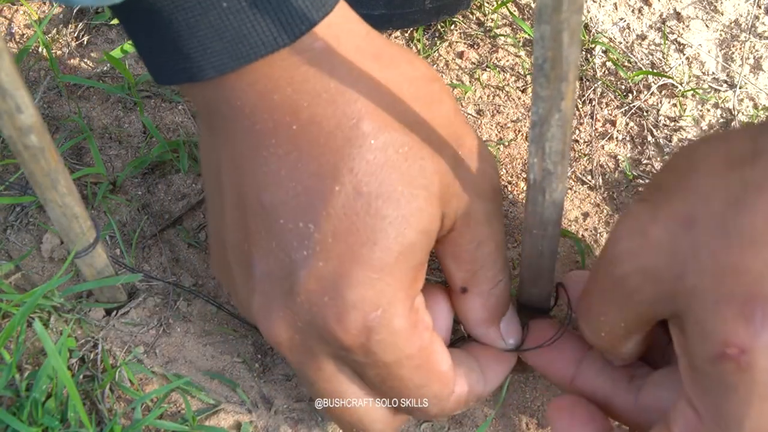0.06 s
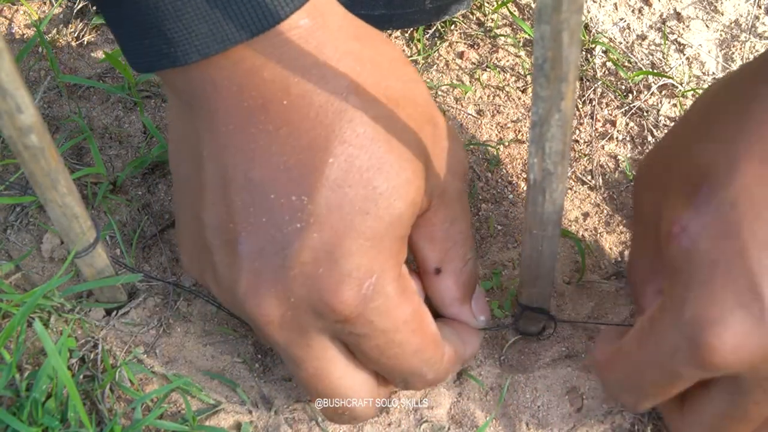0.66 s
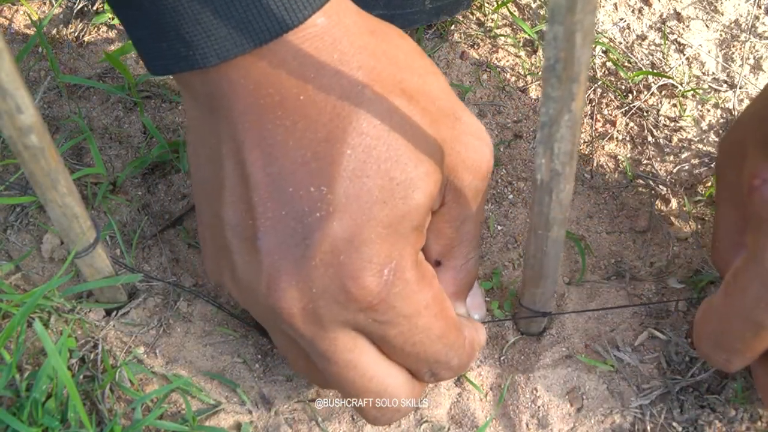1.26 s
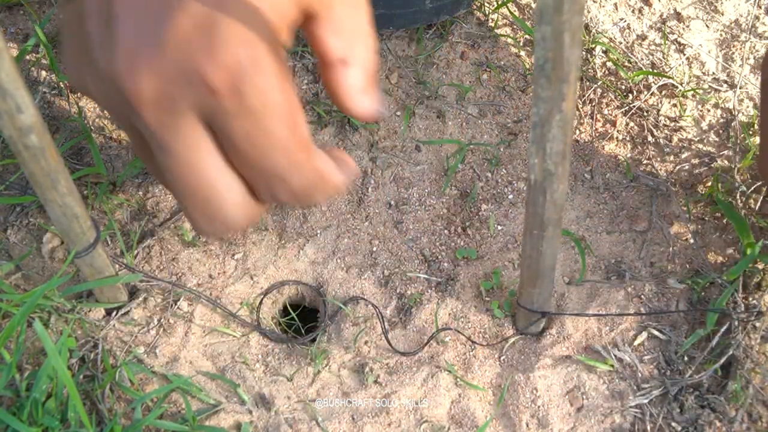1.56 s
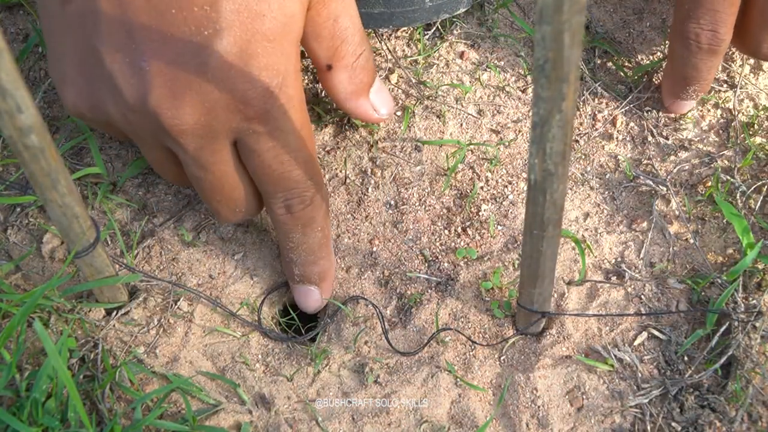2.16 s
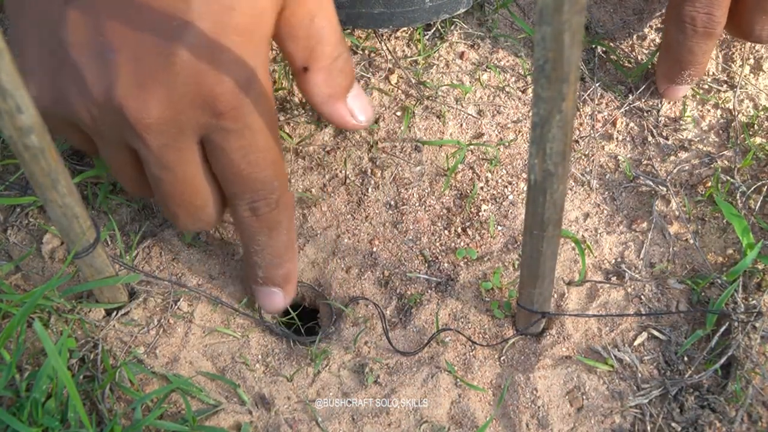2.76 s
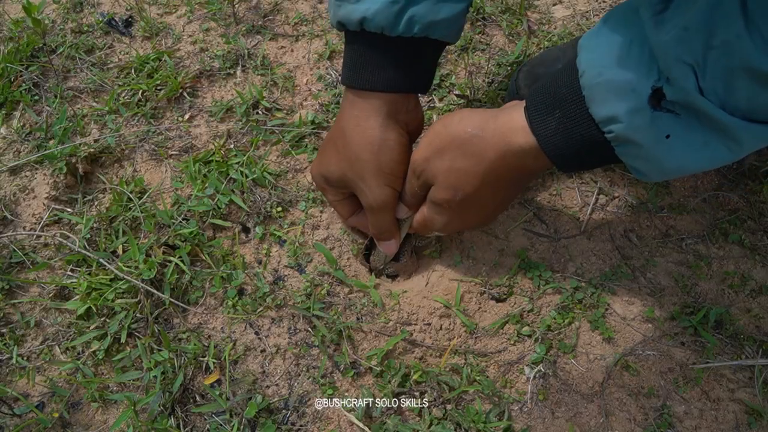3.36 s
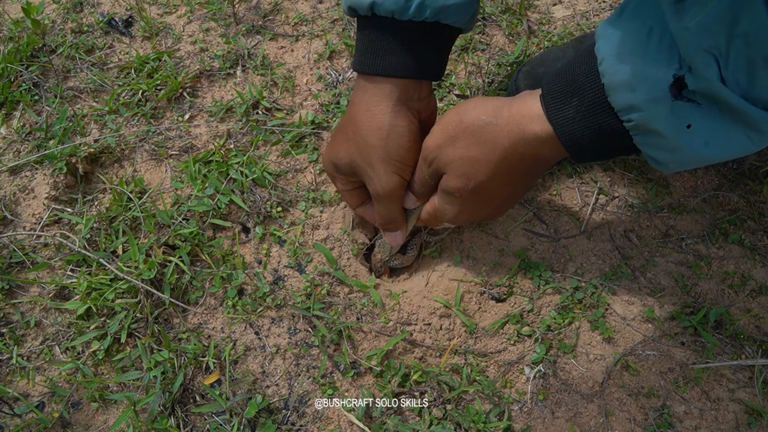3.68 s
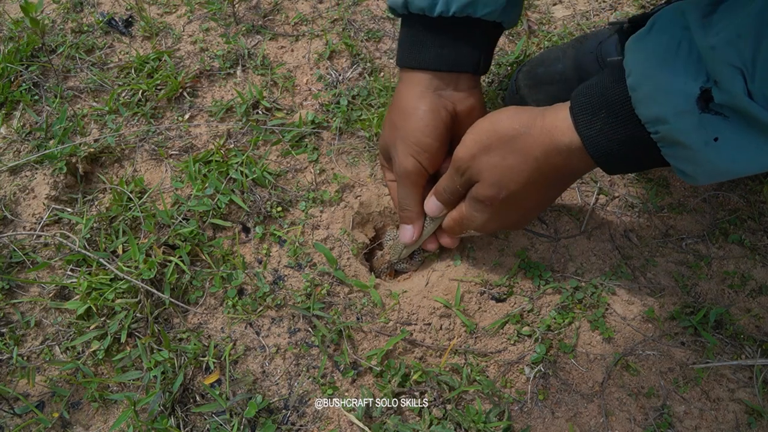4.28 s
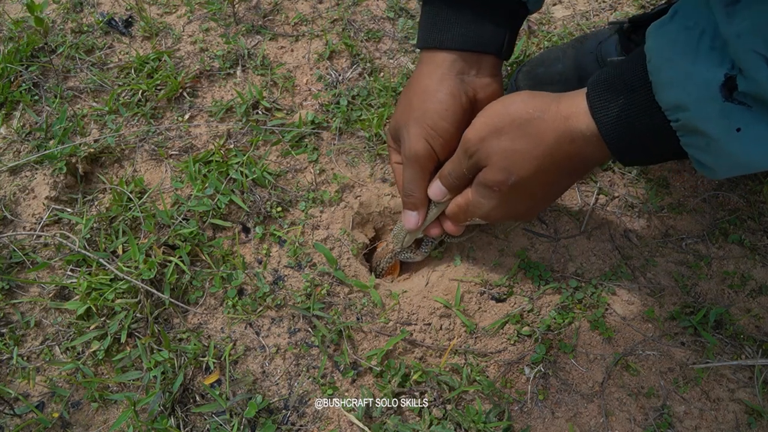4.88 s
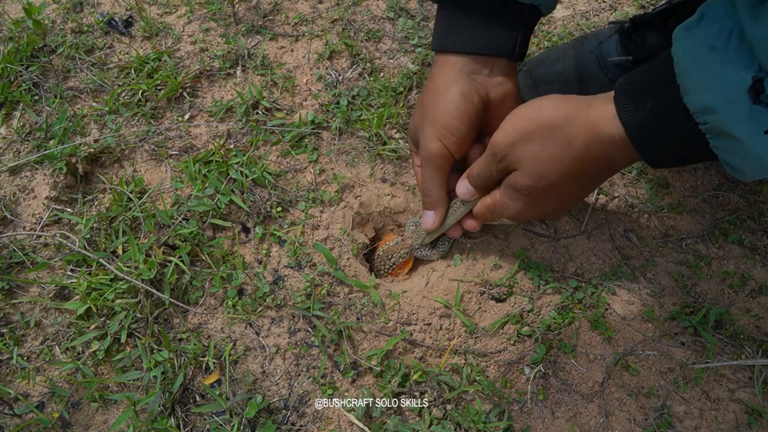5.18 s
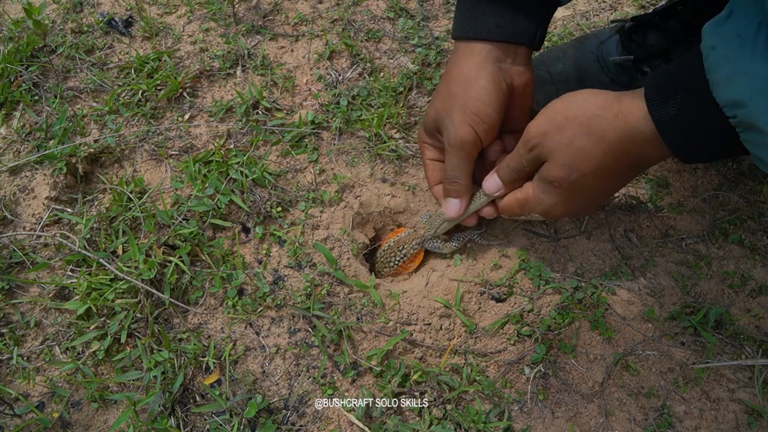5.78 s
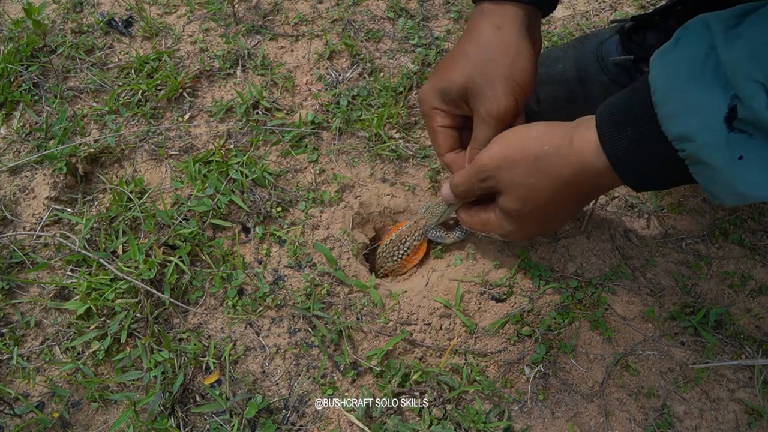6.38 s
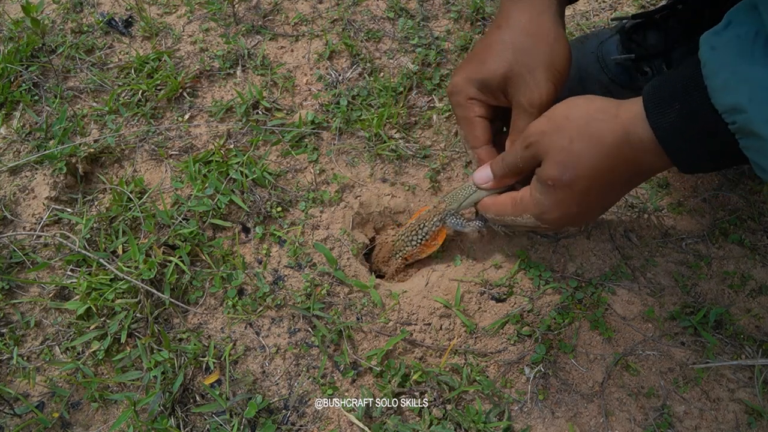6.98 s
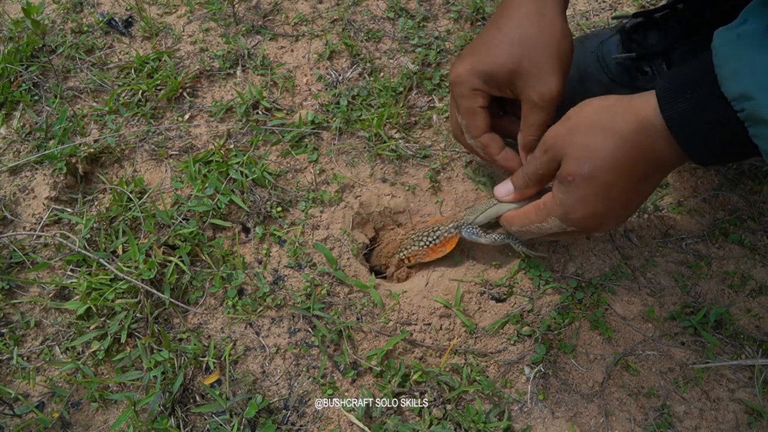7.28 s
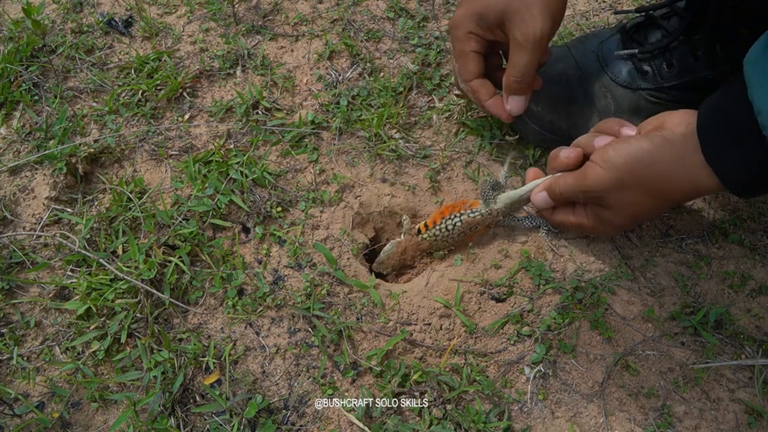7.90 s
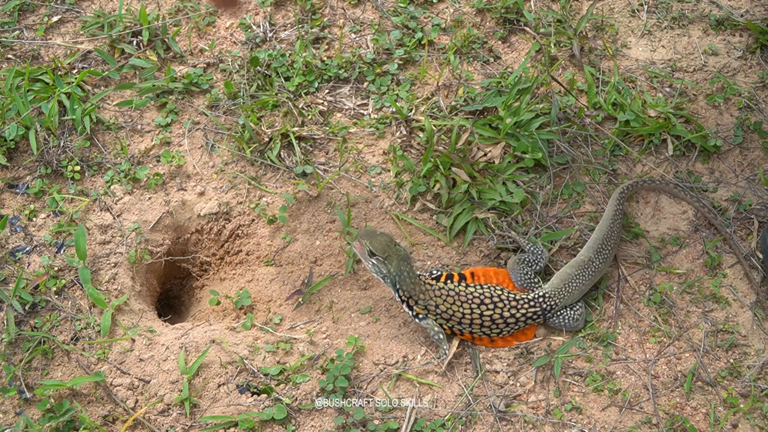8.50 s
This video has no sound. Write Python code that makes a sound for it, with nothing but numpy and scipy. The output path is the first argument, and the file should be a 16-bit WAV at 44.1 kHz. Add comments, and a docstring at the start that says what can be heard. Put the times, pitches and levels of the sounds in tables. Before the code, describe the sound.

A bird repeats a short high chirp over other birds while hands scuff dry sand and a gust of wind rumbles on the microphone.

```python
"""A forest edge: one bird repeats a two- or three-note chirp while others whip, whistle and trill
farther off, their calls scattered by trunks and leaves. Close by, hands scuff and tick in dry sand.
A low hum, outdoor air and a fine hiss lie underneath. Wind rumbles on the microphone, with one
big gust in the middle, and a limiter ducks the whole mix under the loudest peaks."""
import sys
import numpy as np
from scipy import signal
from scipy.fft import rfft, irfft
from scipy.io import wavfile
from scipy.ndimage import uniform_filter1d, minimum_filter1d, map_coordinates

SR = 44100
rng = np.random.default_rng(int(sys.argv[2]) if len(sys.argv) > 2 else 0)


def digitize_waveform(pressure):
    """Quantize a signal to 16-bit integers and store it at the path in sys.argv[1].

    Rows of a 2-D input are taken as channels; values are limited to [-1, 1].
    """
    field = np.atleast_2d(pressure).T
    bounded = np.clip(field, -1, 1)
    quanta = np.round(bounded * 32767).astype(np.int16)
    wavfile.write(sys.argv[1], SR, quanta)


N = 376613
TIME = np.arange(N) / SR
FLICK_S, DROP_S = .008, .008  # a chirp note flicks up into its pitch and drops out of it


def main_bird():
    """A high opening note, then one or two lower ones. Returns the direct sound and the forest send."""
    # start_s, pitch_hz, overtone_db, echo_notch_hz, echo_share, notes as (delay_s, level_db)
    chirps = [(.35, 3065, -2.5, 2980, .3, [(0, -24.5), (.081, -19.5)]),
              (.992, 3060, -17, 3100, .25, [(0, -15), (.079, -18), (.153, -22.5)]),
              (1.62, 3070, -10, 3130, .2, [(0, -19.5), (.082, -19.5)]),
              (2.232, 3110, -11, 2960, .7, [(0, -12.5), (.08, -18), (.166, -24.5)]),
              (2.914, 3130, -13, 3200, .2, [(0, -17.5), (.085, -21), (.177, -25)]),
              (3.627, 3090, -10, 2830, .5, [(0, -17.5), (.084, -24.5), (.19, -29)]),
              (4.381, 3105, -17, 3090, .25, [(0, -13.5), (.086, -15)]),
              (5.027, 3170, -10, 2980, .65, [(0, -19.5), (.083, -22), (.154, -24.5)]),
              (5.698, 3105, -8, 3040, .3, [(0, -15.5), (.085, -24), (.209, -24.5)]),
              (6.449, 3100, -3.5, 2900, .4, [(0, -16.5), (.081, -14.5)]),
              (7.177, 3050, -6, 2850, .75, [(0, -16), (.086, -16.5)]),
              (7.891, 3060, -10.5, 2660, .25, [(0, -13), (.085, -18.5)])]
    # length_s, pitch_ratio, slide_ratio, brightness_db, swell_s, send_db
    opening, following = (.044, 1, .895, 0, .015, -18.5), (.038, .899, .95, -7, .024, -23)
    direct, send = np.zeros(N), np.zeros(N)
    for start, hz, overtone_db, notch_hz, echo, notes in chirps:
        for k, (delay, db) in enumerate(notes):
            near, far = chirp_note(following if k else opening, hz, db, overtone_db, notch_hz, echo)
            add(direct, start + delay - FLICK_S, near)
            add(send, start + delay - FLICK_S, far)
    return direct, send


def chirp_note(kind, call_hz, db, overtone_db, notch_hz, echo):
    """One note flicks up, swells as it slides down, and drops away. Returns direct sound and send."""
    length, pitch, slide, brightness_db, swell_s, send_db = kind
    snap_s, taper_s, ground_delay_s = .003, .01, .0023
    end = length + DROP_S
    t = np.arange(-FLICK_S, end, 1 / SR)
    hz = call_hz * pitch * np.interp(t, [-FLICK_S, 0, length, end], [.78, 1, slide, slide * .76])
    edges_db = np.interp(t, [-snap_s, 0, length, end], [-6, 0, 0, -22])
    edges = gain_of(edges_db) * signal.windows.tukey(len(t), .05)
    # the ground echo beats against the sliding pitch and hollows out part of the note
    comb = abs(1 - echo * np.exp(2j * np.pi * (hz - notch_hz) * ground_delay_s)) / (1 + echo)
    body_db = np.interp(t, [0, swell_s, length - taper_s, length], [-8, 0, 0, -3]) + 20 * np.log10(comb)
    sheen_db = brightness_db - 16 * (2 * t / length - .85) ** 2  # overtones peak in mid note
    partials_db = (body_db, sheen_db + overtone_db, sheen_db - 29)
    direct = bird_tone(hz, flutter_db=2.3, partials_db=partials_db, jitter=.011)
    send = bird_tone(hz, flutter_db=.5, partials_db=(0, -11.5 + brightness_db / 2), jitter=.024)
    return gain_of(db) * edges * direct, gain_of(send_db) * edges * send


def bird_tone(hz, flutter_db, partials_db=(0,), jitter=.0035):
    """A whistle roughened by pitch jitter; paths through the foliage make each partial flutter."""
    phase = 2 * np.pi * np.cumsum(hz * (1 + jitter * wander(len(hz), 301.4))) / SR
    return np.sqrt(2) * sum(gain_of(db + flutter_db * wander(len(hz), 70.2)) * np.sin(k * phase)
                            for k, db in enumerate(partials_db, 1))


def whip_bird():
    """A thin, raspy tone sweeps up an octave, weakens at the top and sweeps back."""
    # start_s, length_s, level_db
    whips = [(.062, .063, -26.5), (.294, .073, -29), (.528, .064, -30), (.769, .065, -32.5),
             (1.256, .092, -30), (1.509, .108, -29), (1.776, .104, -28), (2.506, .069, -34),
             (2.736, .058, -33)]
    octaves, crest = 1.06, .45
    out = np.zeros(N)
    for start, length, db in whips:
        u = np.linspace(0, 1, round(length * SR))
        top_hz = 6550 * (.064 / length) ** .2  # longer whips peak lower
        height = np.interp(u, [0, crest / 2, crest, .64, 1], [0, .35, .93, .97, .2])
        shape_db = np.interp(u, [0, .76 * crest, .55, .8, 1], [-12.5, 0, -6, 0, -15])
        tone = bird_tone(top_hz * 2 ** (octaves * (height - 1)), flutter_db=3, jitter=.036)
        add(out, start, gain_of(db + shape_db) * tone * signal.windows.tukey(len(u), .1))
    return out


def far_birds():
    """Hoarse slurs, pure held whistles and a trill of scooped notes that grows louder."""
    # start_s, length_s, first_hz, last_hz, level_db
    slurs = [(.207, .073, 3600, 2400, -37), (1.345, .052, 7350, 6170, -37.5), (2.0, .041, 3450, 5600, -40),
             (2.123, .04, 2850, 2000, -39), (2.226, .054, 3450, 5600, -43), (2.468, .042, 3450, 5400, -43),
             (3.448, .064, 4050, 3270, -45), (4.102, .071, 3650, 2450, -37.5),
             (4.11, .056, 1270, 1170, -39), (4.32, .038, 5200, 4500, -35.5), (5.99, .057, 3650, 2520, -41),
             (6.932, .054, 3450, 2600, -37.5)]
    # start_s, end_s, level_db
    whistles = [(2.78, 3.018, -47), (3.198, 3.45, -50), (4.473, 4.8, -45), (6.302, 6.622, -46),
                (7.005, 7.3, -46), (7.996, 8.182, -43), (8.323, 8.55, -50)]
    # a whistle's arch: first_hz, middle_hz, last_hz
    whistle_hz = [1290, 1326, 1306]
    out = np.zeros(N)
    for start, length, first, last, db in slurs:
        tone = bird_tone(np.geomspace(first, last, round(length * SR)), flutter_db=3, jitter=.03)
        add(out, start, gain_of(db) * tone * signal.windows.tukey(len(tone), .4))
    arch = np.polyfit([0, .5, 1], whistle_hz, 2)
    for start, end, db in whistles:
        u = np.linspace(0, 1, round((end - start) * SR))
        tone = bird_tone(np.polyval(arch, u), flutter_db=1.5)
        add(out, start, gain_of(db) * tone * signal.windows.tukey(len(u), .4))
    # path through one trill note: pitch_hz
    trill_hz = [2020, 1926, 1746, 1775, 1770, 1890]
    trill_start_s, period_s, note_s, growth_db_per_s = 4.252, .1158, .096, 3.5
    u = np.linspace(0, 1, round(note_s * SR))
    scoop = np.interp(u, np.linspace(0, 1, len(trill_hz)), trill_hz)
    for s in np.arange(11) * period_s:
        tone = bird_tone(scoop, flutter_db=2.5, jitter=.0099) * signal.windows.tukey(len(u), .15)
        add(out, trill_start_s + s, gain_of(-44 + growth_db_per_s * s) * tone)
    return out


def forest(call, t60, build_s):
    """Trunks and leaves scatter a call into echoes that build and die; the paths drift as leaves move."""
    t, out = np.arange(SR) / SR, np.zeros(N)
    echoes_per_s = 1500
    shares = np.array([wander(N, 25) for _ in range(6)])
    for share in shares / np.linalg.norm(shares, axis=0):
        taps = rng.standard_normal(SR) * (rng.random(SR) < echoes_per_s / SR)
        taps *= gain_of(-60 * t / t60) * (1 - np.exp(-t / build_s))
        out += signal.fftconvolve(call * share, taps / np.linalg.norm(taps))[:N]
    return out


def hand_scuffs():
    """Hands rub dry sand: one broad sweep and short, grainy scuffs."""
    # frequency_hz, level_db
    sweep_colour = [(70, 4.5), (140, 0), (200, -4), (280, 5.5), (400, -2.5), (650, -2), (1000, -6.5),
                    (1600, -10.5), (2200, -20), (6000, -26), (15000, -39.5)]
    # start_s, end_s, centre_hz, width_hz, level_db
    scuffs = [(.024, .56, 268, 128, -33), (.407, .526, 600, 1100, -30), (.62, .887, 950, 700, -37),
              (4.32, 4.37, 250, 255, -20), (5.44, 5.49, 1850, 800, -36), (5.54, 5.592, 2150, 900, -33),
              (6.629, 6.833, 760, 280, -34.5), (6.782, 6.95, 1030, 400, -36),
              (7.31, 7.45, 1450, 450, -32.5), (7.546, 8.257, 1870, 460, -38.5),
              (7.799, 8.262, 650, 700, -37.5), (7.92, 8.173, 4900, 600, -40), (8.052, 8.16, 1850, 350, -32),
              (8.299, 8.42, 1100, 800, -34)]
    out = coloured(sweep_colour) * swell(1.41, 1.56, db=-20, attack_s=.075, release_s=.12)
    out *= gain_of(2 * wander(N, 90))
    for start, end, hz, width, db in scuffs:
        size = round((end - start) * SR)
        centre_hz = hz * np.linspace(.95, 1.05, size)  # brightens as the hand speeds up
        carrier = np.exp(2j * np.pi * np.cumsum(centre_hz) / SR)
        grains = rng.standard_normal(size) * gain_of(3.3 * wander(size, 200))
        # a band-pass that rides the moving centre
        rub = (carrier * signal.lfilter(*signal.butter(2, width / 2, fs=SR), grains / carrier)).real
        add(out, start, gain_of(db) * unit_rms(rub) * signal.windows.tukey(size, .7))
    return out


def grit_ticks():
    """Grit and twigs crack in short bursts; the sand damps their treble."""
    # start_s, peak_db, centre_hz, t60_s
    ticks = [(.252, -15.5, 550, .025), (3.487, -20, 1500, .02), (3.547, -20, 1390, .022),
             (4.341, -22.5, 690, .064), (4.602, -8, 1280, .012), (7.97, -12, 1500, .011),
             (8.248, -16, 800, .028)]
    t, out = np.arange(SR // 10) / SR, np.zeros(N)
    for start, db, hz, t60 in ticks:
        crack = rng.standard_normal(len(t)) * gain_of(-60 * t / t60)
        tick = signal.lfilter(*signal.butter(1, [hz * .63, hz * 1.38], "band", fs=SR), crack)
        damped = signal.lfilter(*signal.butter(3, hz * 3, fs=SR), tick)
        add(out, start, gain_of(db) * damped / abs(damped).max())
    return out


def wind():
    """Eddies rock the microphone's diaphragm; gusts over a light breeze set how hard they push."""
    # frequency_hz, level_db
    eddy_colour = [(3, -10), (9, 0.5), (18, 5), (28, -1.5), (40, -7.5), (70, -23.5), (135, -27),
                   (300, -41.5), (1000, -71.5), (5000, -110)]
    # start_s, end_s, level_db
    gusts = [(2.92, 4.6, -10.3), (3.8, 4.3, -6), (5.5, 5.55, -23), (6.15, 6.3, -25), (7.17, 7.2, -17)]
    eddies = coloured(eddy_colour)
    eddies /= np.sqrt(uniform_filter1d(eddies ** 2, size=SR // 6) + 1e-6)  # hold the level even
    push = gain_of(-31) + sum(swell(*gust, attack_s=.13, release_s=.35) for gust in gusts)
    return eddies * push


def low_hum():
    """A wavering hum that swells once, over a far drone."""
    # frequency_hz, level_db
    drone_colour = [(10, -29), (22, -3.5), (42, 0), (52, -2), (63, .5), (74, -5.5), (90, -6.5),
                    (130, -13.5), (200, -19.5), (320, -28.5), (600, -47.5), (4000, -100)]
    pitch_hz, waver_hz = 62.26, 2.8
    phase = 2 * np.pi * np.cumsum(pitch_hz + waver_hz * wander(N, 4)) / SR
    level = gain_of(-23.8) + swell(.5, .64, db=-21, attack_s=.12, release_s=.3)
    hum = np.sqrt(2) * np.sin(phase) * level * gain_of(1.2 * wander(N, 4.9))
    return hum + gain_of(-19.8) * coloured(drone_colour)


def air_and_hiss():
    """Outdoor air and treble hiss drift, then fall away together; a faint fizz tops the opening."""
    # colours: frequency_hz, level_db
    air_colour = [(100, -0.5), (250, 1), (400, -3.5), (650, -5), (1200, -9.5), (2000, -12), (3500, -20.5),
                  (6000, -47), (12000, -70)]
    hiss_colour = [(1500, -5), (3000, 1.5), (4000, -0.5), (6600, 1), (7600, -3.5), (10000, -8),
                   (12500, -14), (15500, -16.5)]
    fizz_colour = [(5000, -24), (9000, -2), (12000, 7), (15500, 0)]
    # fader rides: time_s, level_db
    air_ride = [(0, -30.5), (2.9, -32), (5.2, -34), (8.4, -30.3)]
    hiss_ride = [(0, -41), (1.2, -42), (1.6, -38.5), (2.6, -40.3), (3.5, -38.8), (4.1, -43), (5.2, -41),
                 (7.3, -38.7), (8.1, -35.5)]
    hush_s, fizz_end_s = 8.42, 2.86
    hush_db = -7 * (TIME > hush_s)
    air = coloured(air_colour) * gain_of(curve(air_ride) + hush_db + 1.33 * wander(N, 12))
    hiss = coloured(hiss_colour) * gain_of(curve(hiss_ride) + hush_db + .5 * wander(N, 14))
    fizz = coloured(fizz_colour) * gain_of(-52 + wander(N, 20)) * (TIME < fizz_end_s)
    return air + hiss + fizz


def gain_of(db):
    """Decibels to amplitude."""
    return 10 ** (np.asarray(db) / 20)


def unit_rms(x):
    """Scales to rms 1."""
    return x / np.sqrt(np.mean(x ** 2) + 1e-20)


def curve(rows):
    """Joins (time_s, value) rows by straight lines."""
    return np.interp(TIME, *np.transpose(rows))


def swell(start, end, db, attack_s, release_s):
    """Gain that holds from start to end, 20 dB lower one attack before and one release after."""
    outside = np.maximum((start - TIME) / attack_s, 0) + np.maximum((TIME - end) / release_s, 0)
    return gain_of(db - 20 * outside)


def add(mix, start_s, sound):
    """Mixes a sound in at start_s."""
    part = mix[max(round(start_s * SR), 0):][:len(sound)]
    part += sound[:len(part)]


def coloured(points):
    """Noise of rms 1, its spectrum shaped by (frequency_hz, level_db) points."""
    hz, db = np.transpose(points)
    shape = gain_of(np.interp(np.log(np.fft.rfftfreq(N, 1 / SR) + 1), np.log(hz + 1), db))
    return unit_rms(irfft(rfft(rng.standard_normal(N)) * shape, N))


def wander(size, hz):
    """Smooth random motion of rms near 1, up to about hz cycles a second."""
    knots = rng.standard_normal(int(size / SR * 2 * hz) + 4)
    return map_coordinates(knots, [1 + np.arange(size) / SR * 2 * hz], order=3, mode="nearest")


def scene():
    """Mono mix: the birds, each with forest echo, then hands, background and wind."""
    (near, send), whips, far = main_bird(), whip_bird(), far_birds()
    birds = near + gain_of(-10.5) * forest(send, t60=.92, build_s=.021)
    birds += gain_of(-1) * whips + gain_of(-3.5) * forest(whips, t60=.39, build_s=.0032)
    birds += gain_of(-.5) * far + gain_of(-6) * forest(far, t60=.5, build_s=.0022)
    return (birds + hand_scuffs() + grit_ticks() + low_hum() + air_and_hiss() + wind())[None]


def record(dry):
    """A limiter ducks everything under the gust's peaks; a steep low-pass trims the top."""
    ceiling_db, cutoff_hz = .3, 15750
    allowed = 1 / np.maximum(abs(dry[0]) / gain_of(ceiling_db), 1)
    gain = uniform_filter1d(minimum_filter1d(allowed, size=600), size=500)
    lowpass = signal.firwin(1023, cutoff_hz, window=("kaiser", 9), fs=SR)
    return signal.oaconvolve(dry * gain, lowpass[None], "same")


dry = scene()
out = record(dry)
digitize_waveform(out)
```